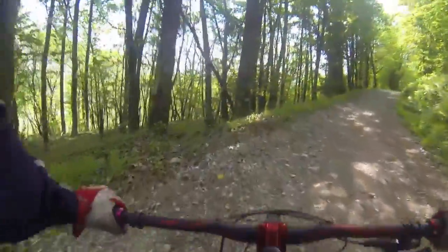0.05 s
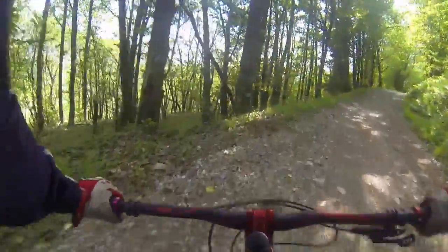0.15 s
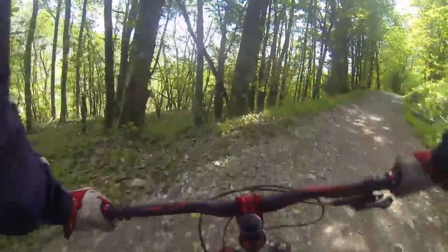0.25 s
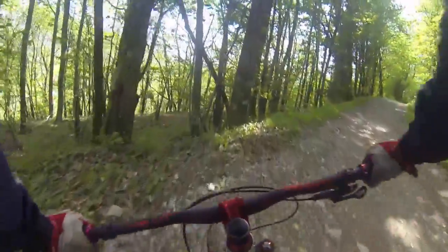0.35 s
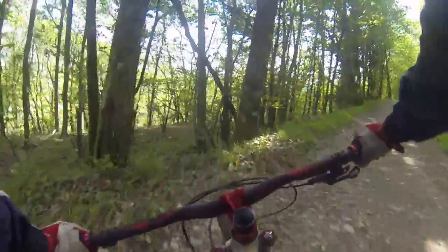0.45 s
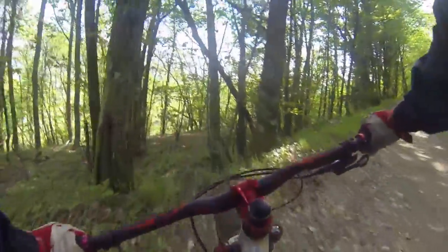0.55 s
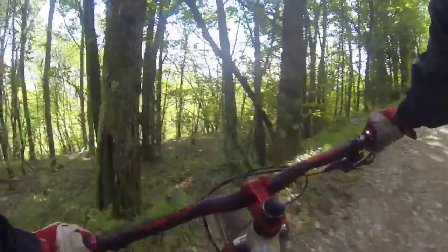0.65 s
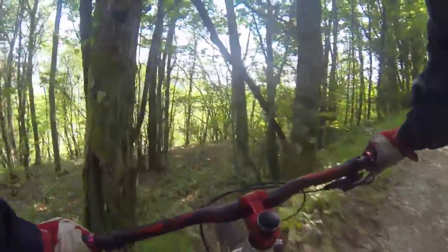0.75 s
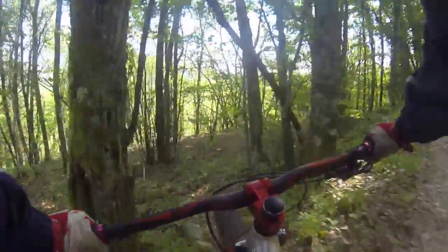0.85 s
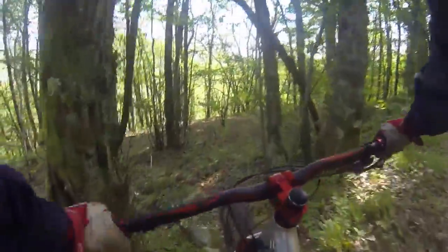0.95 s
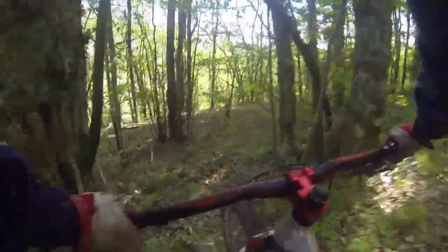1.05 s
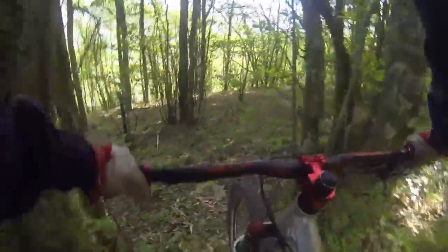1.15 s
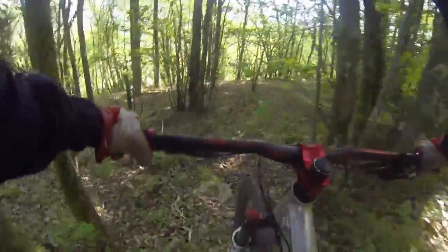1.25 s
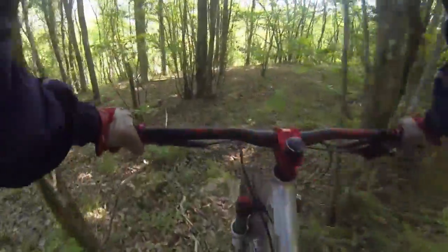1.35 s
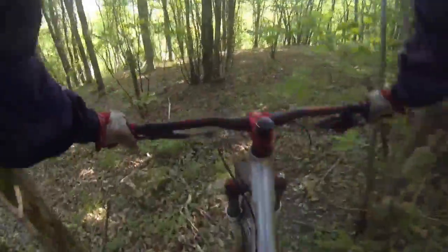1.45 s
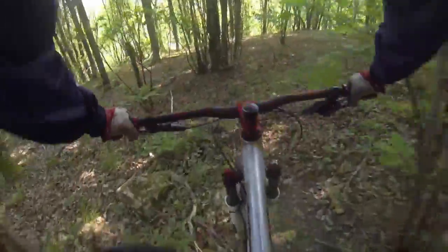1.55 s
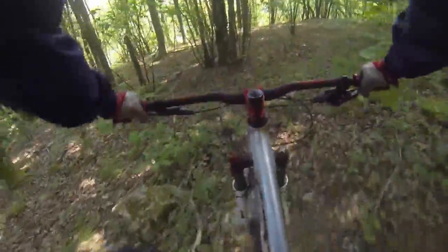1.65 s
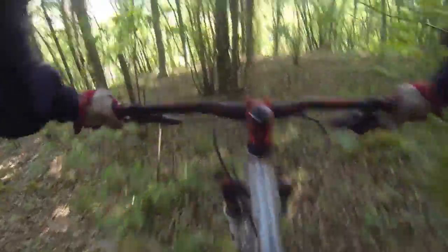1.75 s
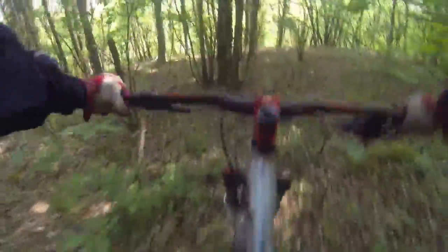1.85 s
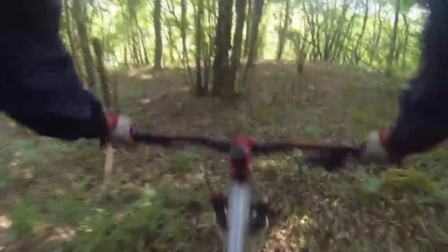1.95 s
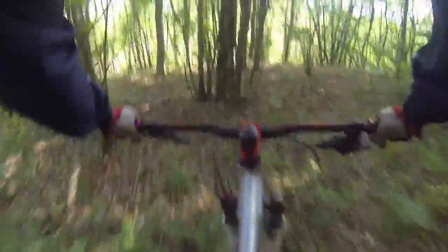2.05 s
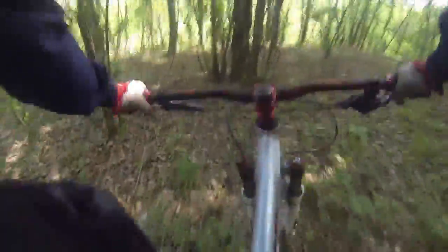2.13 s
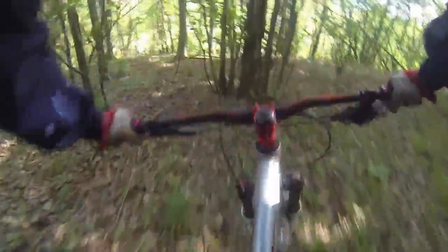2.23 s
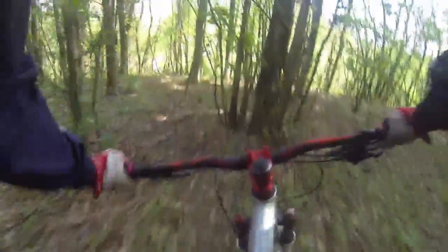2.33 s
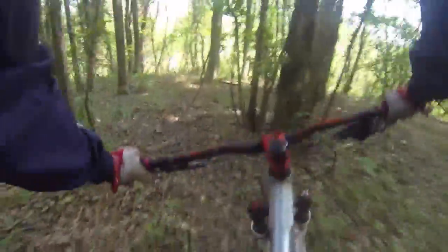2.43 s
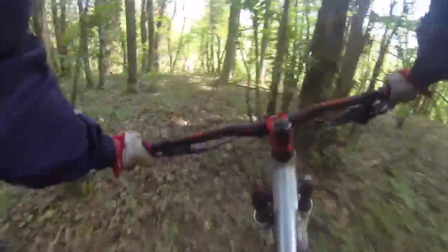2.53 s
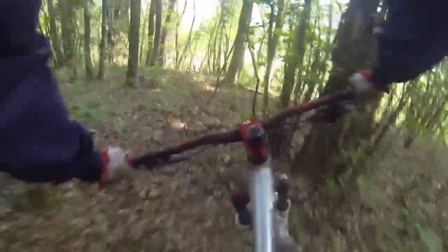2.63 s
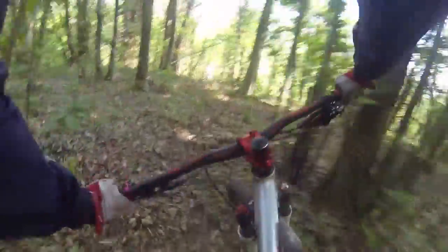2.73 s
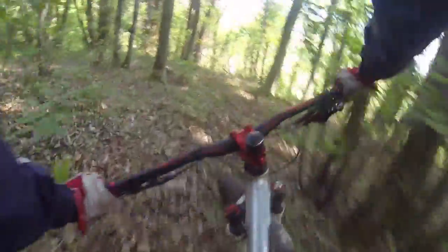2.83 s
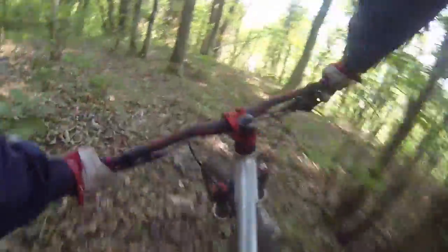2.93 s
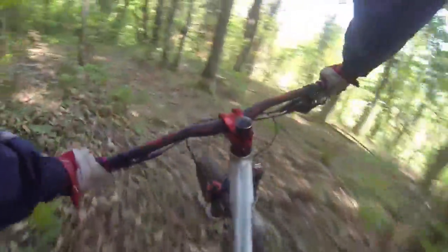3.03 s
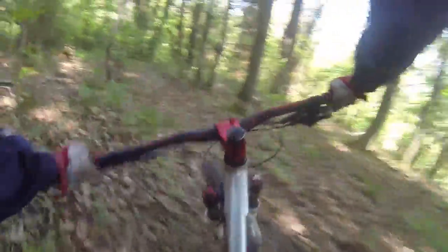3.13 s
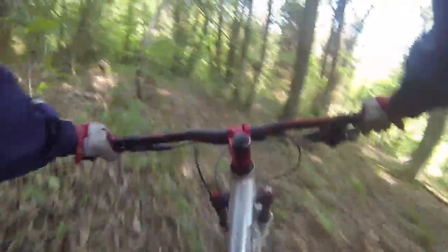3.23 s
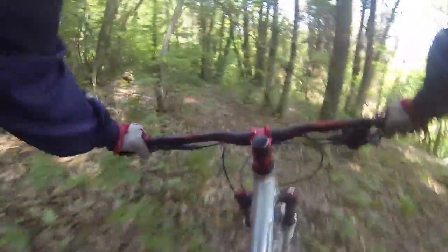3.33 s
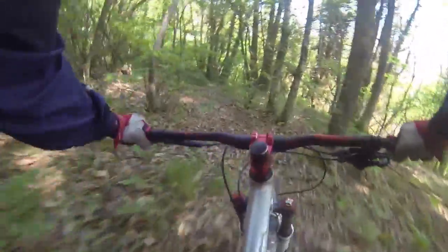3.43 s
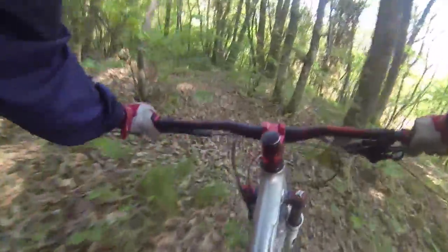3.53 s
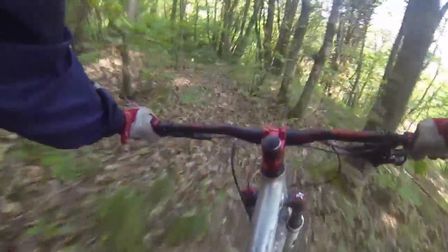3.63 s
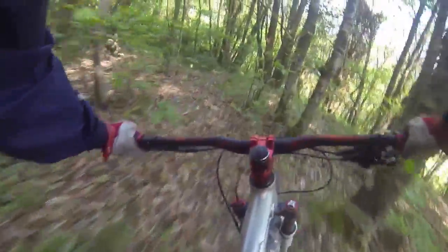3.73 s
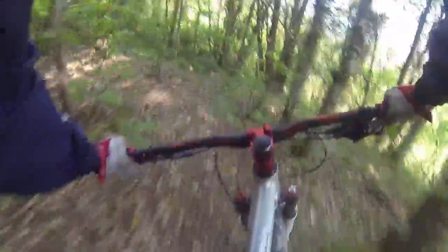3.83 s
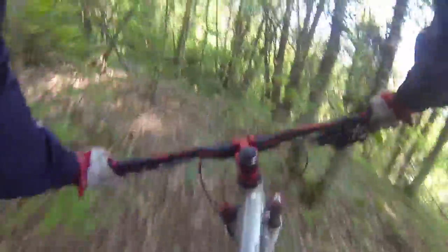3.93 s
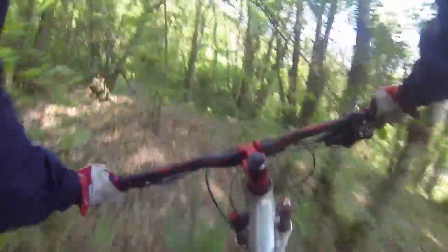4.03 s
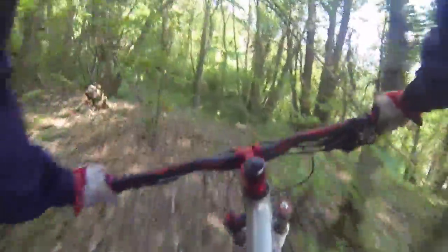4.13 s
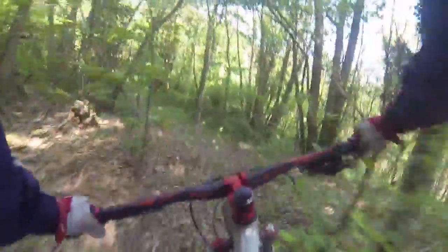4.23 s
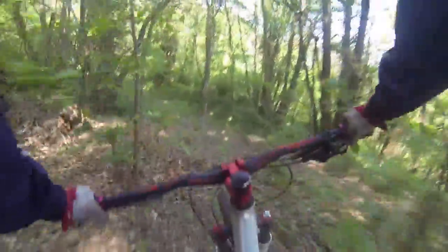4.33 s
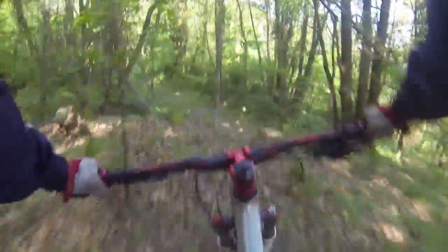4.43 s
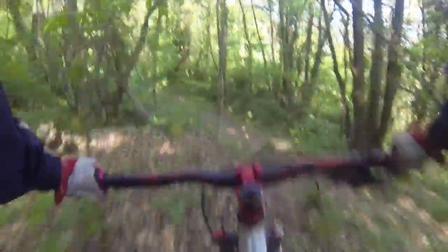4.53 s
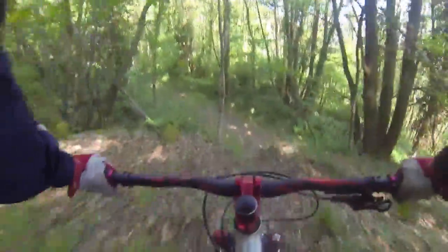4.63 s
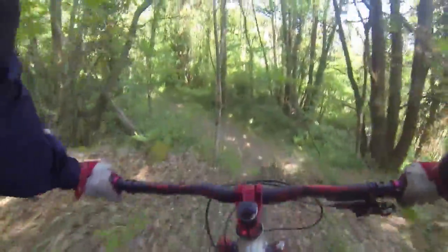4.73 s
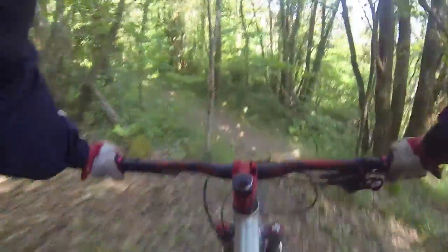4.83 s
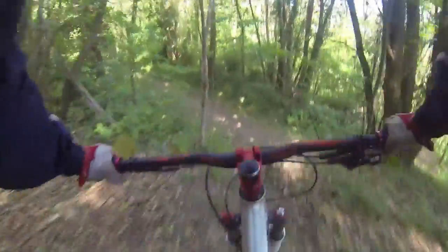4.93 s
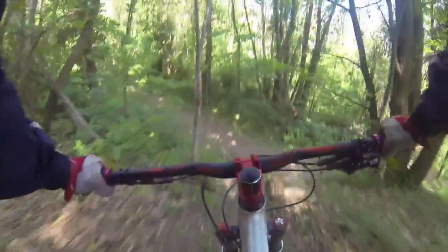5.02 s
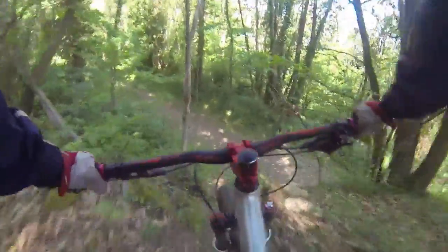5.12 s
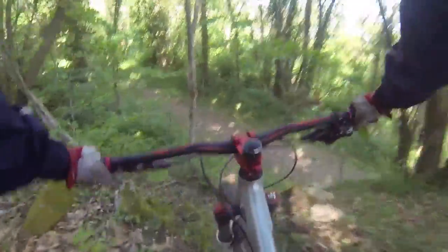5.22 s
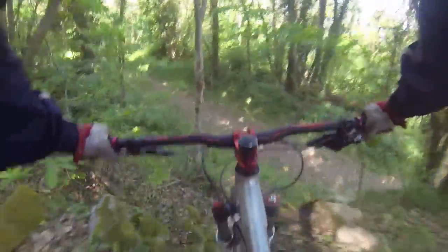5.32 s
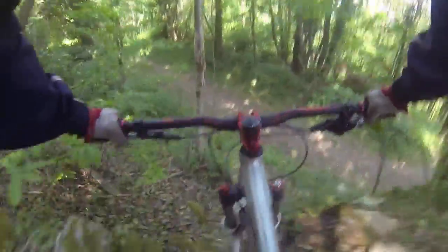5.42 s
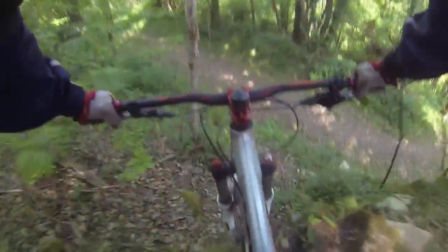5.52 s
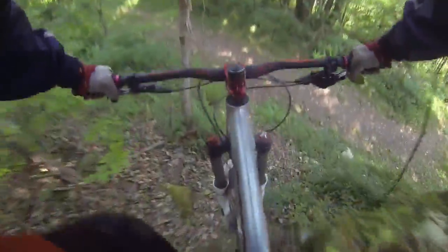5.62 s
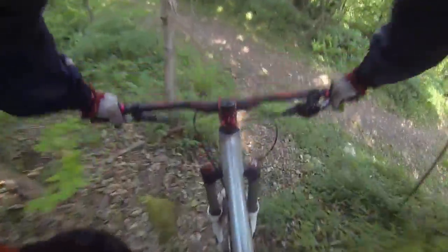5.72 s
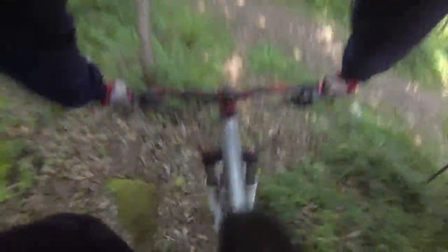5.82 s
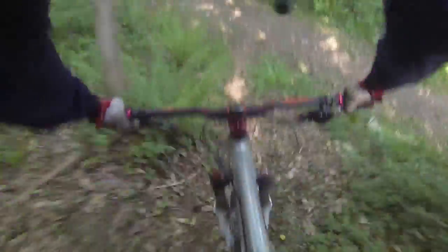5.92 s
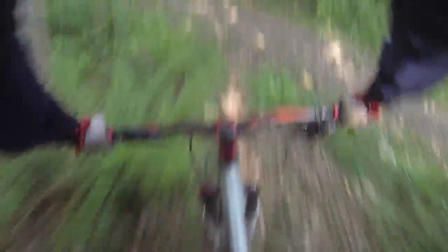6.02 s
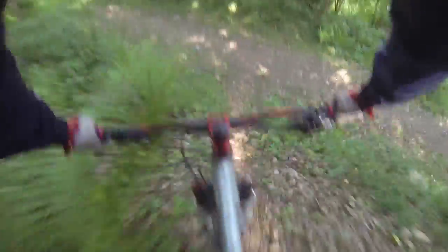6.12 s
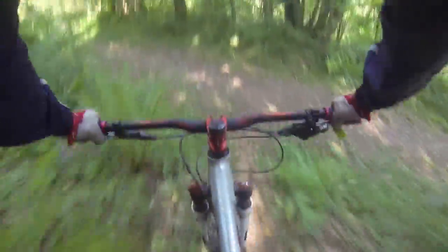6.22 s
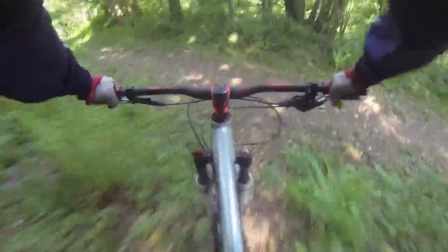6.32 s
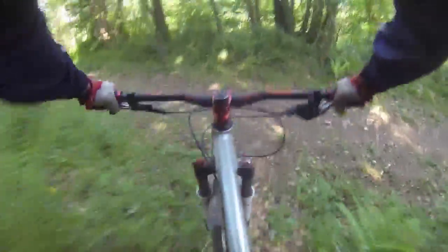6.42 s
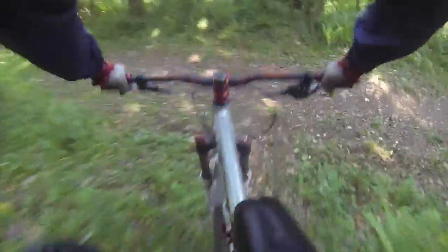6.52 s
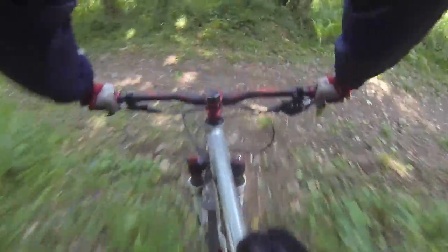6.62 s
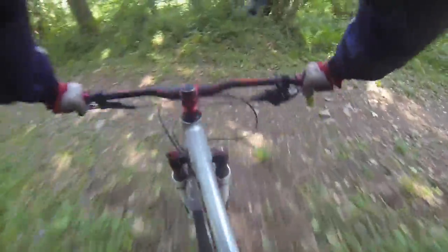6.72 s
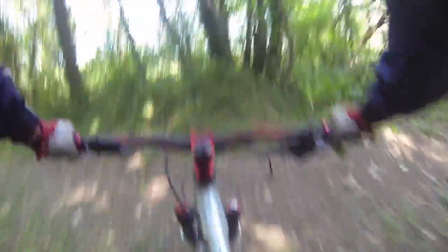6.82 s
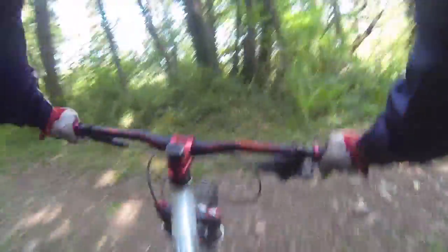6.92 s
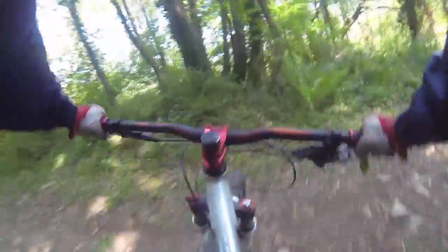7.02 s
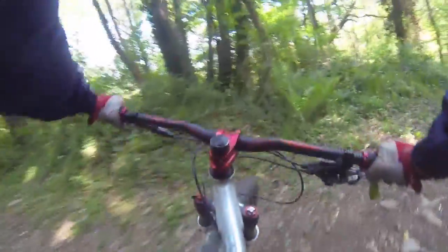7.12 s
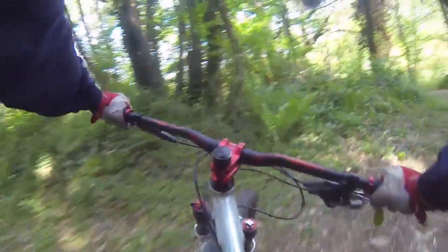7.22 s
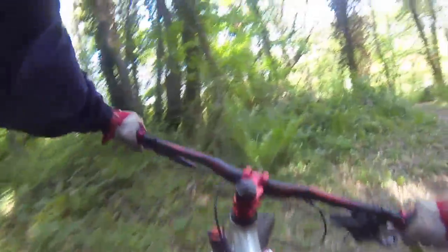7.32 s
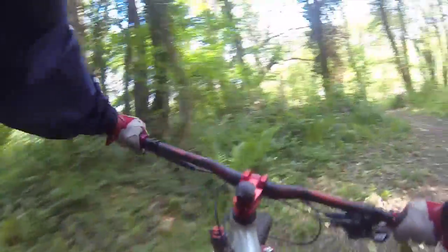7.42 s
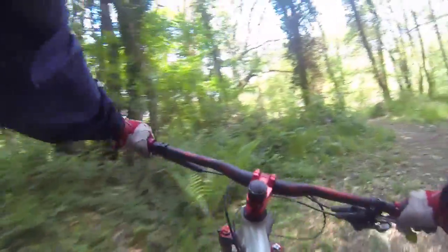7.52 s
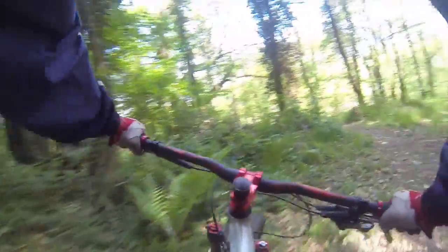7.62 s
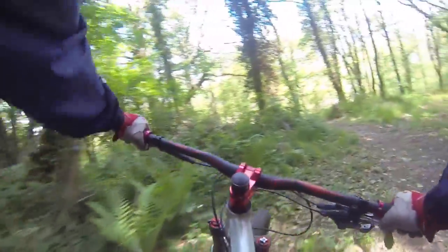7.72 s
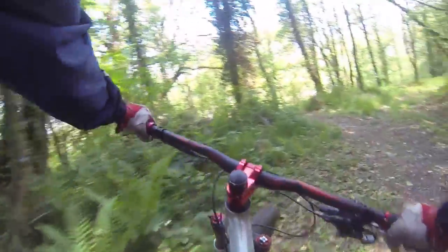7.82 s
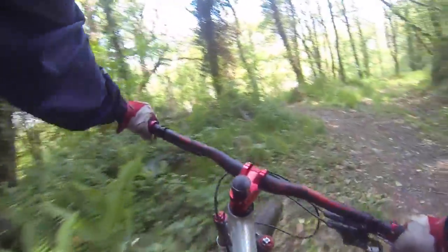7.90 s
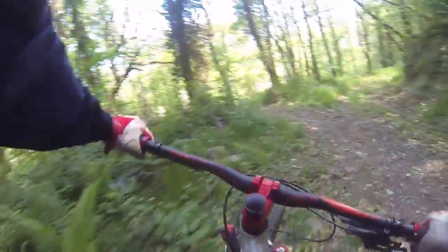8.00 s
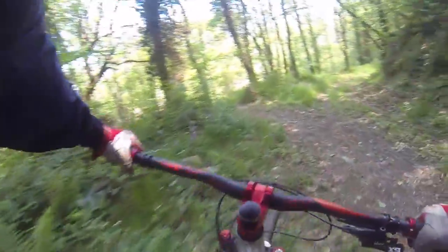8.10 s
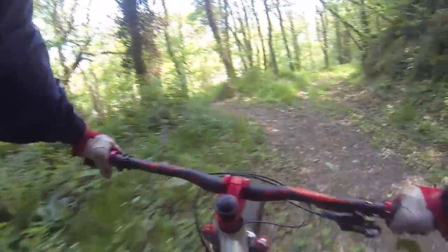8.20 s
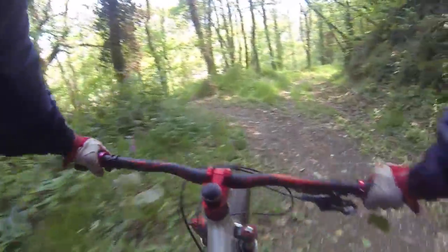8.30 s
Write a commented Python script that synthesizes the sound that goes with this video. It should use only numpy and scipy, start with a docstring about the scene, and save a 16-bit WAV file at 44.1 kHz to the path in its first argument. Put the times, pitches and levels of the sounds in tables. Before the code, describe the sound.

A bike rolls from gravel onto a leafy woodland path, close and muffled inside a camera case. Low buffeting dominates, with irregular dull bumps, dry leaf rustle, small woody taps and dead plastic-like knocks. A quieter middle gives way to a violent landing with booming jolts, clattering parts and sprayed leaves. Faint high squeaks spread apart, more bumps follow, then hard clicking clacks over quiet rolling.

```python
"""On a leafy forest trail, a mountain bike rolls down from a gravel road, heard from a cased camera on the rider's chest.
Filtered noise makes the wind, crunch and rustle; short pushes make the bumps and a soft heartbeat-like thump.
Decaying tones make the bike's rattles; the harder the tyres work, the more small knocks and snaps come by chance.
After a hard dip come thin squeaks that slow down, then three sharp clacks near the end."""
import sys
import numpy as np
from scipy import signal
from scipy.fft import rfft, irfft, next_fast_len
from scipy.io import wavfile
from scipy.ndimage import uniform_filter1d, map_coordinates

SR = 44100
rng = np.random.default_rng(int(sys.argv[2]) if len(sys.argv) > 2 else 0)


def to_wav(sig):
    """Store sig (one row per channel, or 1-D mono) as 16-bit WAV at the path in sys.argv[1].

    Samples outside -1..1 are clipped; the rate is SR.
    """
    pcm = np.clip(np.atleast_2d(sig), -1, 1) * 32767
    pcm = np.round(pcm).astype(np.int16)
    wavfile.write(sys.argv[1], SR, pcm.T)  # frames by channels


N = 368676  # length in samples

# All levels are relative: the functions below may add a level of their own.
# wind and body movement over time: time_s, level_db
SWAY = [(0.0, -30), (0.67, -37.5), (1.56, -28), (1.82, -27), (2.14, -32), (2.35, -38), (2.54, -28),
        (2.86, -27.5), (3.26, -36.5), (4.12, -32), (4.61, -29), (5.35, -34), (5.87, -34), (6.85, -27),
        (7.19, -35), (8.36, -41.5)]
# the deepest buffets of wind: middle_s, level_over_sway_db, half_length_s
GUSTS = [(1.714, 11, 0.018), (2.167, 12, 0.032), (2.44, 11, 0.046), (5.672, 7, 0.023), (6.016, 14, 0.09)]
# how hard the ground shakes the mount: time_s, level_db
SHAKE = [(0, -52), (.5, -52), (1.3, -47), (1.7, -46.5), (2.03, -47.5), (2.15, -32.5), (2.26, -48.5),
         (2.9, -45.5), (3.7, -51), (4.2, -48), (5.5, -53.5), (5.8, -43), (5.99, -36), (6.08, -41.5),
         (6.55, -42), (6.8, -37.5), (7.1, -49.5), (7.6, -52.5), (8.36, -48.5)]
# how hard the tyres work the ground: time_s, level_db
RIDE = [(0.0, -54.5), (0.49, -58.5), (0.91, -55), (1.24, -57.5), (1.42, -52), (1.72, -51), (2.56, -52),
        (2.96, -51), (3.7, -56), (4.24, -55.5), (4.82, -57.5), (5.12, -55.5), (5.52, -57), (5.76, -48),
        (6.03, -46.5), (6.12, -45.5), (6.87, -48.5), (7.26, -52), (7.47, -59.5), (8.36, -60.5)]
# dry leaves under the tyres: time_s, level_db
LITTER = [(0.0, -68.5), (0.67, -76), (2.98, -59), (3.51, -66), (3.98, -65.5), (4.13, -60.5), (4.25, -65),
          (5.66, -74.5), (6.05, -56), (6.47, -69), (6.89, -58.5), (7.12, -71.5), (7.89, -76), (8.36, -69)]
# a tyre slides briefly on grit: middle_s, level_db, half_length_s
SCRAPES = [(0.548, -54, 0.0068), (1.729, -41, 0.0079), (1.853, -40, 0.0037), (3.062, -49, 0.006),
           (5.477, -46.5, 0.0063), (5.639, -44, 0.029), (6.11, -43.5, 0.025), (6.464, -46, 0.018),
           (6.697, -43, 0.018), (6.774, -40.5, 0.034), (6.857, -44, 0.009), (7.089, -43, 0.0094),
           (8.293, -55, 0.015)]
# the big jolts of the mount: middle_s, level_db, half_length_s
BUMPS = [(0.055, -21.5, 0.0016), (0.157, -23.5, 0.0018), (0.799, -27, 0.0012), (1.021, -24.5, 0.0014),
         (1.542, -23.5, .0015), (1.588, -13, 0.0032), (1.855, -11.5, 0.0031), (1.94, -16.5, 0.0026),
         (2.076, -15, 0.0026), (2.149, -14.5, 0.0017), (2.445, -16.5, 0.0027), (2.5, -28.5, 0.0011),
         (2.81, -15.5, 0.0015), (2.846, -23, 0.0021), (2.927, -16.5, 0.0025), (2.957, -11, 0.0027),
         (3.109, -20.5, 0.0025), (5.056, -15, 0.0024), (5.21, -21, 0.0024), (5.633, -5, .0022),
         (5.701, -8.5, 0.0023), (5.788, -19.5, 0.0016), (5.878, -0.5, 0.0072), (5.912, -5.5, 0.0021),
         (5.93, -9.5, 0.0015), (5.984, -5.5, 0.0012), (5.996, -7.5, 0.003), (6.015, 1.0, 0.01),
         (6.081, -17, 0.002), (6.108, -7.5, 0.0074), (6.158, -16.5, 0.0014), (6.175, -10.5, 0.0026),
         (6.299, -13.5, 0.0022), (6.318, -9, 0.002), (6.389, -3.5, 0.01), (6.768, -9.5, 0.0061),
         (6.809, -2, 0.0093), (6.907, -8, 0.0077), (6.985, -11.5, 0.0016), (7.229, -23, 0.0019),
         (7.43, -21, 0.0018)]
# broad strokes of cloth and plants brushing by: middle_s, level_db, half_length_s
SWISHES = [(0.135, -44.5, 0.0075), (0.893, -51, 0.026), (1.051, -50, 0.022), (1.134, -41.5, 0.034),
           (1.219, -45, 0.0046), (1.294, -44, 0.016), (1.372, -48.5, 0.021), (1.475, -46, 0.023),
           (1.593, -38, 0.028), (1.716, -47.5, 0.028), (1.833, -41, 0.011), (1.914, -44, 0.0095),
           (2.095, -40.5, 0.02), (2.275, -49.5, 0.048), (2.614, -45, 0.015), (2.818, -44, 0.02),
           (2.94, -48.5, 0.03), (3.043, -41, 0.022), (3.27, -47, 0.024), (4.508, -48.5, 0.019),
           (5.051, -42.5, 0.019), (5.135, -45, 0.017), (5.224, -43, 0.035), (5.633, -43, 0.014),
           (5.692, -46, 0.016), (5.804, -44.5, 0.0094), (5.88, -47.5, 0.029), (5.926, -29.5, 0.017),
           (6.607, -48.5, 0.01), (6.681, -39, 0.019), (6.791, -41.5, 0.038), (6.957, -40.5, 0.018),
           (7.225, -53, 0.011), (7.31, -49, 0.016), (7.446, -53, 0.017), (7.574, -51, 0.012),
           (7.875, -54, .015), (8.296, -54, 0.013)]
# the sharpest twigs snapping: start_s, level_db, pitch_hz
SNAPS = [(0.282, -48, 7040), (1.952, -45, 5000), (2.019, -46, 6000), (2.2974, -43, 6500),
         (2.753, -29, 8200), (2.753, -33.5, 3100), (3.05, -42, 11500), (4.54, -45.5, 7500),
         (6.007, -42, 7300), (6.116, -37.5, 5900), (6.211, -41, 6000), (7.7147, -43, 3070)]
# loose parts of the bike knock: start_s, level_db, pitch_hz
KNOCKS = [(.02, -26, 1420), (.153, -35, 1290), (1.631, -25, 1350), (1.638, -28, 1410), (1.724, -34, 1360),
          (2.403, -30, 1440), (2.588, -29.5, 1510), (2.756, -31.5, 1340), (5.533, -35, 1450),
          (5.768, -34, 1380), (5.8, -23.5, 1370), (5.882, -20, 1510), (5.8885, -17, 1600),
          (5.8945, -19, 1650), (5.904, -16.5, 1430), (5.913, -18, 1670), (5.988, -33, 1470),
          (6.17, -26.5, 1460), (6.213, -28, 1580), (6.319, -29.5, 1360), (6.431, -36, 1400),
          (7.084, -29.5, 1360)]
# the wheels hit sticks and stones: start_s, level_db
TAPS = [(0.148, -44), (1.006, -42.5), (1.536, -38), (1.63, -35.5), (1.723, -32), (1.957, -36.5),
        (2.365, -33), (2.402, -42), (2.588, -36.5), (2.802, -31.5), (5.767, -36), (5.888, -31),
        (5.905, -26), (6.08, -32.5), (6.756, -38)]
# hard clacks, likely the shifter: start_s, level_db
CLACKS = [(7.62, -28.5), (7.632, -38), (7.7084, -20.5), (7.7212, -36), (7.892, -32), (7.8965, -34.5)]
# a small steel part pinging: start_s, level_db
PINGS = [(2.121, -43), (6.007, -43), (6.32, -41)]
# loudness of the squeaks over time: time_s, level_db
SQUEAK_LEVEL = [(6.11, -51), (6.5, -61), (6.68, -53), (6.78, -69), (6.9, -57)]
# the tones the camera case rings at: pitch_hz, level_db, t60_s (time to fade by 60 dB)
CASE = [(465, -1, 0.016), (1261, -3, 0.016), (1399, 1, 0.023), (1490, 12, 0.016), (1680, -20, 0.033),
        (2750, -26, 0.02), (3210, -3.5, 0.017), (3644, -17, 0.01), (4630, -13, 0.085), (5125, -25, 0.039),
        (6870, -12, 0.007)]

# Tone colours of the noises. Columns of each: frequency_hz, level_db (per hertz)
# the steady rush of passing air
AIR_COLOUR = [(100, 0.5), (280, -1), (450, -7), (900, -10.5), (2500, -18), (10000, -26), (15000, -35)]
# wind and body sway
RUMBLE_COLOUR = [(4, -16), (9, 2), (15, 0.5), (25, -8), (40, -19.5), (60, -26.5), (100, -38), (400, -100)]
# the shaken mount
SHUDDER_COLOUR = [(30, -57.5), (70, 3), (120, 2.5), (200, -6.5), (300, -19), (400, -20.5), (470, -24),
                  (540, -30), (1000, -42.5), (2500, -68)]
# tyre tread on grit
CRUNCH_COLOUR = [(150, -19.5), (400, 0), (470, -13.5), (540, -9), (1060, -8), (1180, -5), (1290, 7.5),
                 (1420, 7), (1560, 5.5), (1670, 0.5), (1880, -8), (2200, 1), (3000, -14), (6000, -38)]
# rustling under the tyres, also the dry crack of a clack
RUSTLE_COLOUR = [(500, -25), (1200, -1.5), (1900, -2), (2150, 8.5), (2700, 2.5), (3000, 0), (3400, -6.5),
                 (3730, -6.5), (4100, -13), (4500, -15), (5100, -5.5), (6000, -25.5), (8000, -33),
                 (14000, -41)]
# crumpling dry leaves
LEAVES_COLOUR = [(2500, -3), (5000, 1), (6200, -1), (7100, -4.5), (8200, 0.5), (8900, -11), (10100, -2),
                 (11000, -7.5), (14000, -12), (15200, -74)]
# cloth and plants brushing by
BRUSH_COLOUR = [(200, 7.5), (470, -5.5), (620, -11.5), (1100, 1), (1400, 6.5), (1650, 2), (1900, 1),
                (2200, 9), (2700, 4), (3300, -10), (3730, -3.5), (4200, -12), (5200, -5.5), (6000, -21),
                (7200, -14), (12000, -27), (15000, -46)]
# a stick or stone
HOLLOW_COLOUR = [(100, 0.5), (250, 3), (470, 2), (620, 4), (800, 3.5), (1100, 1.5), (1500, -7.5),
                 (2500, -22), (8000, -58)]

TOP_HZ = 15300  # band limit of the camera
# a soft steady thump, perhaps the rider's heartbeat against the chest mount
BEAT_FIRST_S, BEAT_PERIOD_S = 0.475, 0.376
BEAT_DB, BEAT_HALF_S = -20, 0.0035
CLACK_HZ = 2094  # main ring of a clack
# a run of thin squeaks, perhaps a brake disc: each gap is SQUEAK_SLOWING times the one before
SQUEAK_START_S, SQUEAK_GAP_S, SQUEAK_SLOWING = 6.111, 0.0435, 1.092
SQUEAK_DUTY = 0.16  # half length of a squeak over the gap to the next
SQUEAK_TOP_HZ, SQUEAK_TOP_S, SQUEAK_ARCH_HZ_PER_S2 = 14660, 6.41, 4400  # pitch follows one arch
CHATTER_T60_S, CHATTER_RISE_S = 0.012, 0.0006
SNAP_T60_S, SNAP_RISE_S = 0.025, 0.0007


def amp(db):
    """Turn decibels into a gain."""
    return 10 ** (np.asarray(db) / 20)


def unit(x):
    """Scale to an average (rms) level of 1."""
    return x / np.sqrt(np.mean(x ** 2) + 1e-20)


def curves(rows):
    """Draw straight lines between the table points, one curve for each column after the time."""
    time_s, *columns = np.transpose(rows)
    return [np.interp(np.arange(N) / SR, time_s, column) for column in columns]


def wobble(rate):
    """A smooth random curve through this many random points a second."""
    points = rng.standard_normal(int(N * rate / SR) + 4)
    return map_coordinates(points, [np.arange(N) * rate / SR])


def swell(s, half, edge=2):
    """A smooth rise and fall around time s, more abrupt as edge grows; peak 1."""
    return np.exp(-np.abs((np.arange(N) / SR - s) / half) ** edge / 2)


def colour(x, points):
    """Shape the tone of x by (Hz, dB) points, with no sound before its cause; rms 1."""
    m = 2 * next_fast_len(N // 2 + 8192)
    hz, db = np.transpose(points)
    log_hz = np.log(np.fft.rfftfreq(m, 1 / SR) + 1)
    cepstrum = irfft(np.log(amp(np.interp(log_hz, np.log(hz), db))))
    # folding the second half onto the first makes the filter respond only after its input
    cepstrum[1:m // 2] *= 2
    cepstrum[m // 2 + 1:] = 0
    return unit(irfft(rfft(x, m) * np.exp(rfft(cepstrum)))[:N])


def grit(rate, spread_db, hiss):
    """Random impacts of uneven size, about rate a second, on a bed of finer noise."""
    happens = rng.random(N) < rate / SR
    size = amp(spread_db * np.minimum(rng.standard_normal(N), 2))
    hits = happens * rng.choice([-1, 1], N) * size
    return unit(hits) + hiss * rng.standard_normal(N)


def ring(hz, t60, attack):
    """One struck tone that fades by 60 dB in t60 seconds; cut after a tenth of a second."""
    t = np.arange(SR // 10) / SR
    return np.sin(2 * np.pi * hz * t) * 1000 ** (-t / t60) * (1 - np.exp(-t / attack))


def burst(t60, rise):
    """Loudness of a crumbling contact: it swells quickly, then dies; peak 1."""
    t = np.arange(SR // 10) / SR
    shape = (1 - np.exp(-(t / rise) ** 2)) * 1000 ** (-t / t60)
    return shape / shape.max()


def add(track, s, sound):
    """Mix a sound into the track from time s."""
    start = max(round(s * SR), 0)
    part = track[start:start + len(sound)]
    part += sound[:len(part)]


def strays(count, over_db):
    """Small chance events as (s, dB): the harder the ride, the closer together and the louder they are."""
    ground_db, = curves(RIDE)
    busy = np.cumsum(amp(ground_db))
    when, size = rng.random((count, 2)).T
    # one event in each equal share of the total effort
    at = np.searchsorted(busy, busy[-1] * (np.arange(count) + when) / count)
    level_db = ground_db[at] + over_db + 3 * (2 * size - 1)
    return list(zip(at / SR, level_db))


def air(level_db=-62):
    """A faint even rush of passing air under everything, made of filtered noise."""
    return amp(level_db) * colour(rng.standard_normal(N), AIR_COLOUR)


def wind(rumble_db=8.0, shudder_db=0, lumps_db=3.5, calm=1.0):
    """Air and body sway heave at the case; the mount shudders with the ground, most as the heave peaks."""
    sway_db, = curves(SWAY)
    shake_db, = curves(SHAKE)
    heave_db = sway_db + sum(db * swell(s, half) for s, db, half in GUSTS)
    heave = colour(rng.standard_normal(N), RUMBLE_COLOUR)
    heave /= np.sqrt(np.abs(uniform_filter1d(heave ** 2, SR // 5)) + 0.12)  # evens out long lulls
    lumps = amp(lumps_db * wobble(22))
    shudder = colour(rng.standard_normal(N) * lumps * (calm + np.abs(heave)), SHUDDER_COLOUR)
    return amp(heave_db + rumble_db) * heave + amp(shake_db + shudder_db) * shudder


def bumps(level_db=-3.5, rebound=0.38, judder_db=-21, settle=0.026,
          mount_db=-15, mount_hz=195, mount_t60=0.032):
    """Each jolt or beat is a push with a slower rebound; sharper ones leave the mount ringing and juddering."""
    push, judder, t = np.zeros(N), np.zeros(N), np.arange(N) / SR
    beat_times = np.arange(BEAT_FIRST_S, N / SR, BEAT_PERIOD_S)
    beats = [(s, BEAT_DB, BEAT_HALF_S) for s in beat_times]
    for s, db, half in BUMPS + beats:
        near = np.abs(t - s) < 0.1
        age = t[near] - s
        u = age / half
        recoil = rebound * np.exp(-np.abs(u / 2 - 1) ** 2)
        push[near] += amp(db + level_db) * (recoil - np.exp(-np.abs(u) ** 2.14))
        # the judder builds twice as fast as it settles
        fade = np.exp(np.where(age < 0, 2 * age, -age) / settle)
        judder[near] += amp(db + judder_db) * min(1, 0.0014 / half) * fade
        sharp = np.exp(-(np.pi * mount_hz * half) ** 2 / 2)  # only a short push sets the mount ringing
        add(push, s, amp(db + mount_db) * sharp * ring(mount_hz, mount_t60, attack=half))
    return push + judder * colour(rng.standard_normal(N), SHUDDER_COLOUR)


def landing(s=5.929, half=0.01423, spray_db=-43, boom_db=-26, boom_t60=0.081):
    """The bike bottoms out in the dip: leaves spray as noise and the case booms at its lowest tone."""
    out = amp(spray_db) * swell(s, half) * colour(rng.standard_normal(N), LEAVES_COLOUR)
    lowest_hz = CASE[0][0]
    add(out, s - half, amp(boom_db) * ring(lowest_hz, boom_t60, attack=0.0036))
    return out


def squeaks(count=12, sag_hz=90, waver_hz=170):
    """Each squeak is a rough, very high tone that sags in pitch; as the run slows, each lasts longer."""
    out = np.zeros(N)
    for k in range(count):
        gap = SQUEAK_GAP_S * SQUEAK_SLOWING ** k
        s = SQUEAK_START_S + (gap - SQUEAK_GAP_S) / (SQUEAK_SLOWING - 1)  # all earlier gaps added up
        t = np.arange(-gap, gap, 1 / SR)
        u = t / (SQUEAK_DUTY * gap)
        hz = SQUEAK_TOP_HZ - SQUEAK_ARCH_HZ_PER_S2 * (s - SQUEAK_TOP_S) ** 2
        waver = unit(uniform_filter1d(rng.standard_normal(len(t)), size=40))
        phase = 2 * np.pi * np.cumsum(hz - sag_hz * u + waver_hz * waver) / SR
        level = amp(np.interp(s, *np.transpose(SQUEAK_LEVEL)))
        add(out, s - gap, level * np.exp(-u ** 2 / 2) * np.sin(phase))
    return out


def hardware(clack_db=0, crack_db=-23, ping_db=-2, ping_hz=5700):
    """A hard part clacks with a dry noise crack and a short woody ring; a steel part pings as one tone."""
    out, hz = np.zeros(N), CLACK_HZ
    clack = ring(hz, t60=0.017, attack=0.0008)
    clack += 0.81 * ring(hz * 1.077, t60=0.013, attack=0.001)
    clack += 0.065 * ring(hz * 1.71, t60=0.02, attack=0.0005)
    clack += 0.16 * ring(hz * 0.624, t60=0.038, attack=0.00044)
    clack *= amp(clack_db) / np.abs(clack).max()
    for s, db in CLACKS:
        add(out, s, amp(db) * clack)
        crack = burst(t60=0.015, rise=0.00035)
        noise = colour(rng.standard_normal(N), RUSTLE_COLOUR)[:len(crack)]
        add(out, s, amp(db + crack_db) * crack * noise)
    for s, db in PINGS:
        own_hz = ping_hz * (1 + 0.0079 * rng.normal())
        add(out, s, amp(db + ping_db) * ring(own_hz, t60=0.041, attack=0.0011))
    return out


def snaps(level_db=0, width=0.38, small_hz=5500):
    """A brittle twig crack: a burst of noise gathered around its own pitch; width is in octaves each side."""
    out, shape = np.zeros(N), burst(SNAP_T60_S, SNAP_RISE_S)
    octaves = np.log2(np.fft.rfftfreq(len(shape), 1 / SR) + 1)
    small = [(s, db, small_hz) for s, db in strays(count=10, over_db=1)]
    for s, db, hz in SNAPS + small:
        band = 1 / (1 + ((octaves - np.log2(hz)) / width) ** 2)
        crack = shape * irfft(rfft(rng.standard_normal(len(shape))) * band)
        add(out, s, amp(db + level_db) * crack / np.abs(crack).max())
    return out


def swishes(level_db=0, catch_db=2.0, edge=2.34):
    """Short sliding strokes, each a swell of friction grains that catch and slip."""
    stroke = sum(amp(db + level_db) * swell(s, half, edge) for s, db, half in SWISHES)
    grains = grit(rate=1500, spread_db=5, hiss=0.98) * amp(catch_db * wobble(160))
    return stroke * colour(grains, BRUSH_COLOUR)


def taps(level_db=-8, t60=0.048):
    """A wheel hits a stick or stone: a dull burst of noise that dies at once."""
    blows = np.zeros(N)
    for s, db in TAPS:
        add(blows, s, amp(db + level_db) * burst(t60, rise=0.0015))
    return blows * colour(rng.standard_normal(N), HOLLOW_COLOUR)


def knocks(level_db=0, scatter_db=2, chatter_db=-17, contact_t60=0.049, case_db=-9, dead_t60=0.011,
           small_hz=1430):
    """A loose part gives a short dead knock at its own pitch and chatters faintly against the ringing case."""
    out, contact = np.zeros(N), burst(CHATTER_T60_S, CHATTER_RISE_S)
    small = [(s, db, small_hz * (1 + 0.1 * rng.normal())) for s, db in strays(count=12, over_db=7)]
    for s, db, own_hz in KNOCKS + small:
        modes = 0
        for k, (hz, level, t60) in enumerate(CASE):
            touched_t60 = 1 / (1 / t60 + 1 / contact_t60)  # the touching part shortens the ring
            gain = (-1) ** k * amp(level + scatter_db * rng.normal())
            modes = modes + gain * ring(hz, touched_t60, attack=0.00012)
        force = amp(chatter_db) * contact * rng.standard_normal(len(contact))
        force[0] = 1  # the first hit
        answer = signal.fftconvolve(modes, force)[:len(modes)]
        knock = ring(own_hz, dead_t60, attack=0.00091)
        blow = unit(knock) + amp(case_db) * unit(answer)
        add(out, s, amp(db + level_db) * blow / np.abs(blow).max())
    return out


def crackle(count=1500, hz=2100, octaves=0.81, cycles=11, spread_db=5.5):
    """Loose stones and twigs tick under the tread, each a short tone at its own pitch; rms 1."""
    out = np.zeros(N)
    for when, pitch, size in rng.random((count, 3)):
        own_hz = hz * 2 ** (octaves * (2 * pitch - 1))
        level = amp(spread_db * min(-np.log(1 - size), 3))
        add(out, when * N / SR, level * ring(own_hz, cycles / own_hz, attack=0.0004))
    return unit(out)


def tyres(crunch_db=-4.5, rustle_db=0, leaves_db=1.5, pebbles_db=-15, leafy=0.29, crackle_db=-9.5,
          bite_db=2.0, drift=0.033):
    """Knobs crush grit and leaves and roll over pebbles; uneven ground shakes crunch, rustle and leaves together."""
    ground_db, = curves(RIDE)
    litter_db, = curves(LITTER)
    brush_db = (1 - leafy) * ground_db + leafy * litter_db  # rustling needs both pace and leaves
    shake = wobble(28)

    tread = grit(rate=220, spread_db=1.0, hiss=0.61) * amp(1.27 * shake + bite_db * wobble(110))
    low = colour(tread, [(hz * (1 - drift), db) for hz, db in CRUNCH_COLOUR])
    high = colour(tread, [(hz * (1 + drift), db) for hz, db in CRUNCH_COLOUR])
    small_stones = (1 + np.tanh(2 * wobble(30))) / 2  # the crunch sounds higher on finer grit
    crunch = unit(small_stones * high + (1 - small_stones) * low)

    pebbles = colour(grit(rate=59, spread_db=7.0, hiss=0.26), HOLLOW_COLOUR)
    rustle_grains = grit(rate=1200, spread_db=11.0, hiss=2.0)
    rustle = colour(rustle_grains * amp(1.66 * shake + 2.6 * wobble(70)), RUSTLE_COLOUR)
    clumps = amp(0.73 * shake + 2.95 * wobble(240))  # leaves crumple in brief soft clumps
    leaves = colour(rng.standard_normal(N) * clumps, LEAVES_COLOUR)

    scrape = sum(amp(db) * swell(s, half) for s, db, half in SCRAPES)
    rolling = np.hypot(amp(ground_db + crunch_db), scrape) * crunch
    rolling += amp(ground_db) * (amp(crackle_db) * crackle() + amp(pebbles_db) * pebbles)
    return rolling + amp(brush_db + rustle_db) * rustle + amp(litter_db + leaves_db) * leaves


def case(x, boost_db=4):
    """Airborne sound is lifted in a narrow peak at every tone of the case."""
    m = next_fast_len(N + 8192)
    f = np.fft.rfftfreq(m, 1 / SR)
    gain = 1
    for hz, _, t60 in CASE:
        damping = 1j * f * np.log(1000) / (np.pi * t60)
        gain = gain * (1 + (amp(boost_db) - 1) * damping / (hz * hz - f * f + damping))
    return irfft(rfft(x, m) * gain, m)[:N]


def scene():
    """Airborne sounds pass through the case; the rest are added directly at the one microphone inside it."""
    trail = case(air() + landing() + snaps() + swishes() + taps() + tyres())
    return (wind() + bumps() + squeaks() + hardware() + knocks() + trail)[None]


def record(dry):
    """The camera keeps nothing above its band limit."""
    m = next_fast_len(N + 8192)
    kept = np.fft.rfftfreq(m, 1 / SR) < TOP_HZ
    return irfft(rfft(dry, m) * kept, m)[:, :N]


dry = scene()
out = record(dry)
to_wav(out)
```